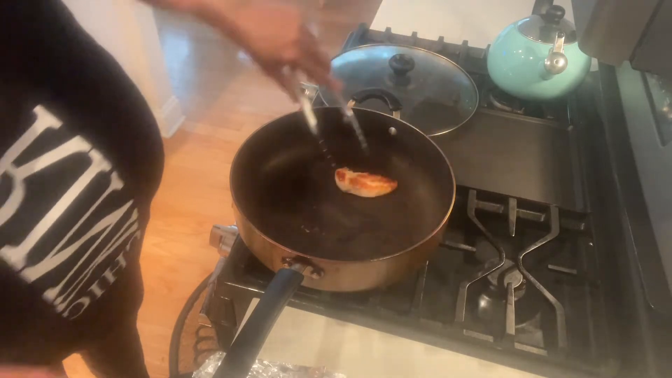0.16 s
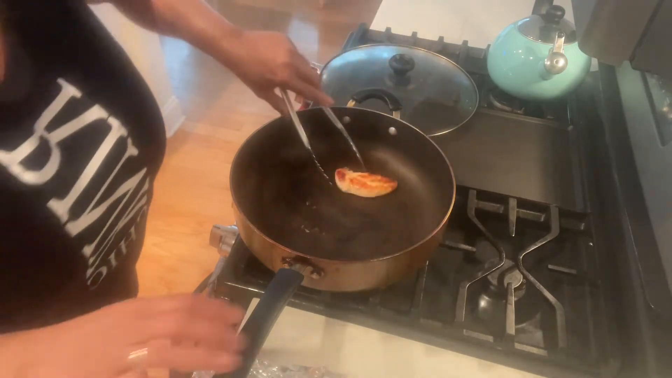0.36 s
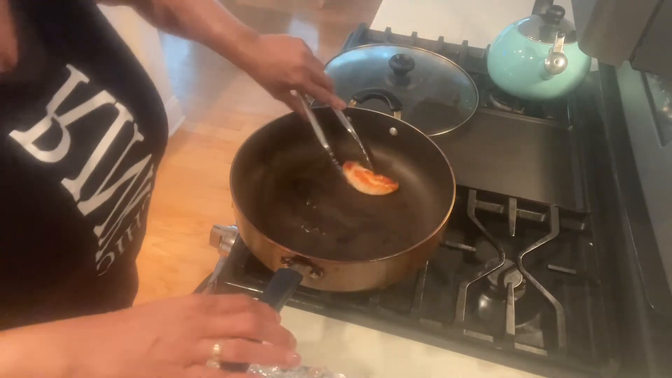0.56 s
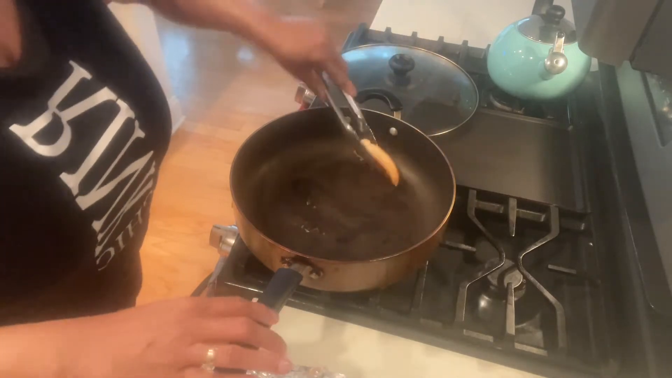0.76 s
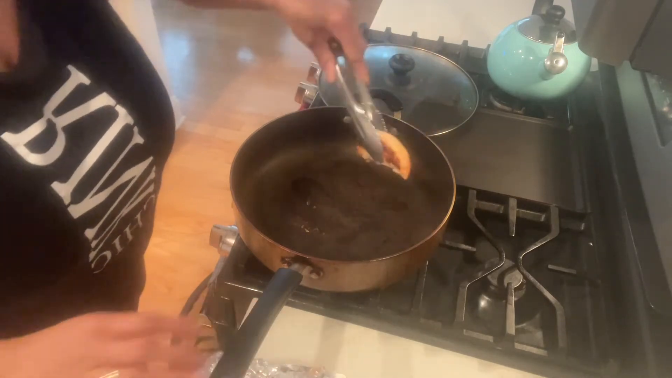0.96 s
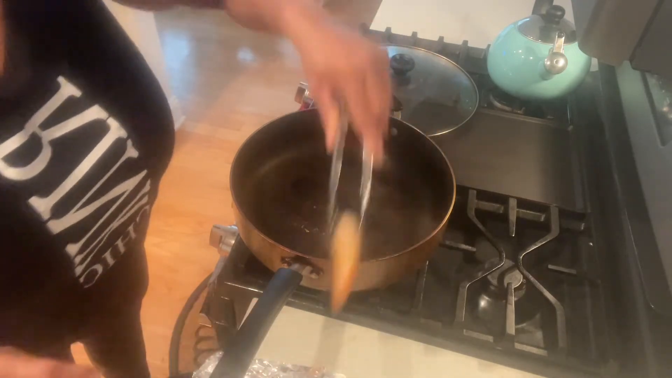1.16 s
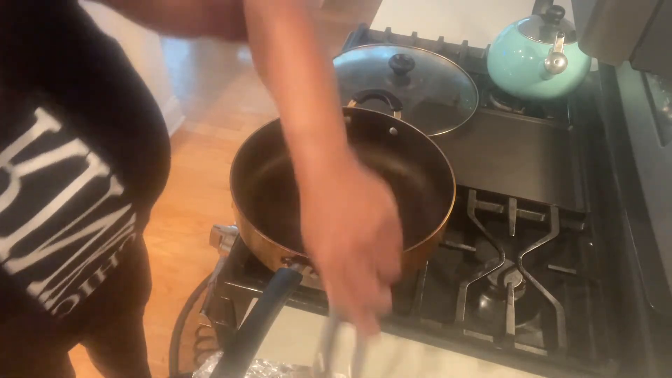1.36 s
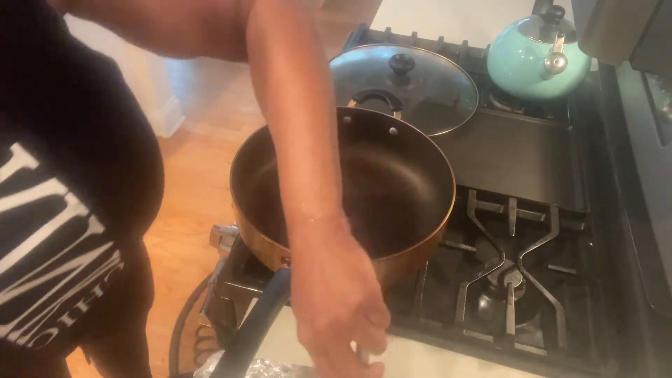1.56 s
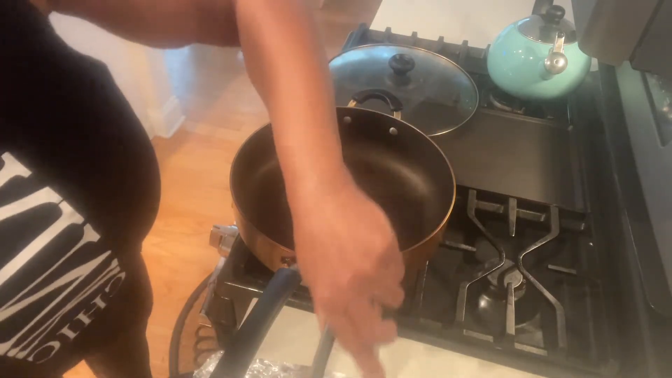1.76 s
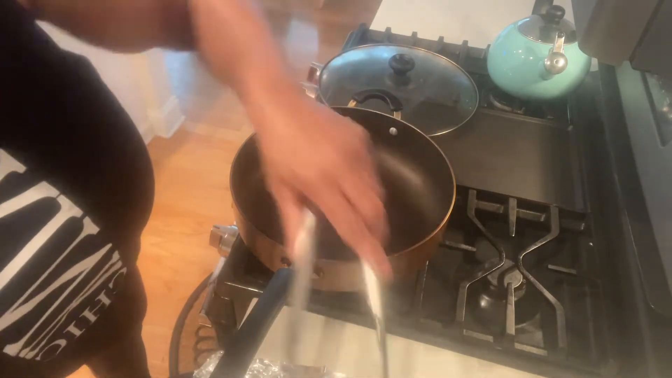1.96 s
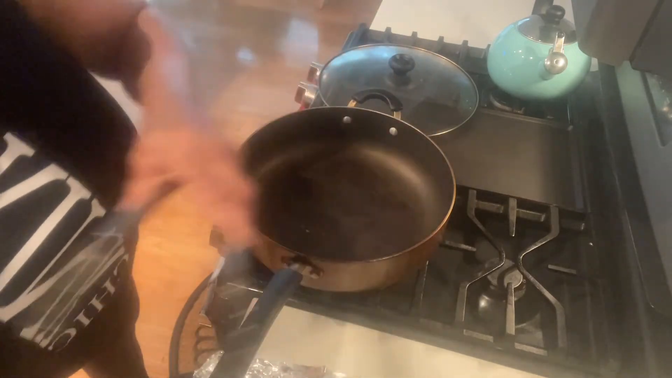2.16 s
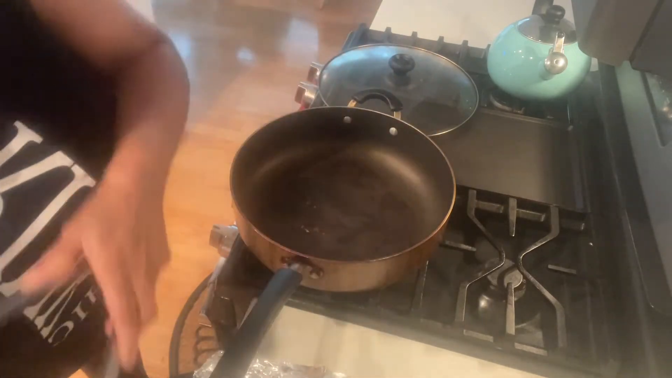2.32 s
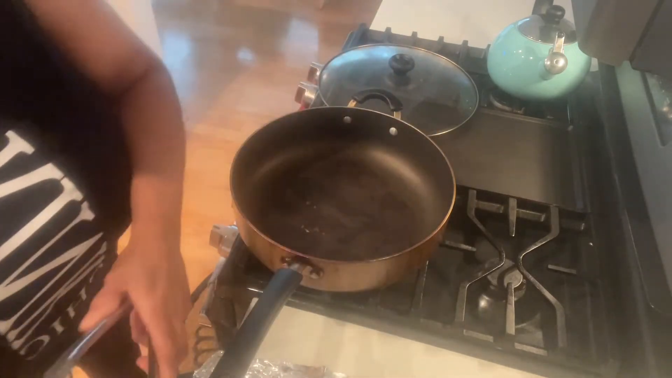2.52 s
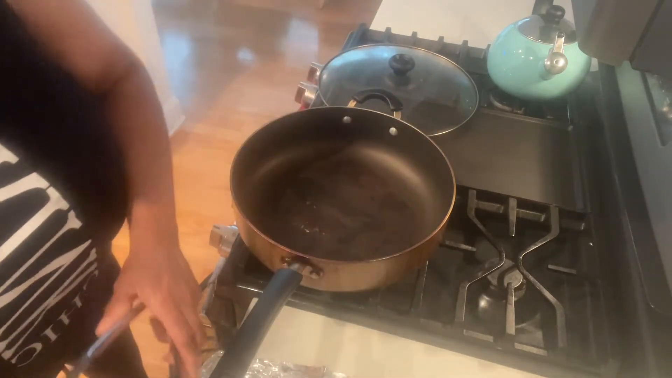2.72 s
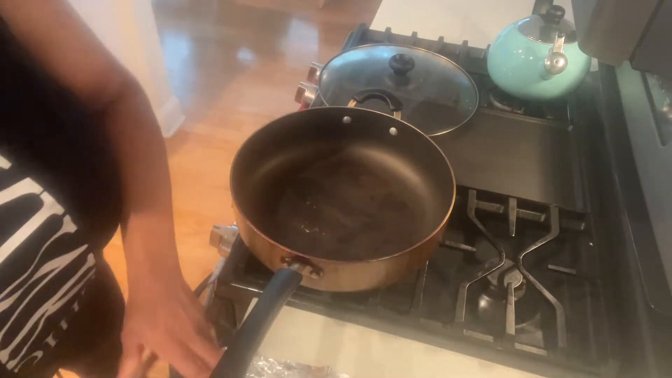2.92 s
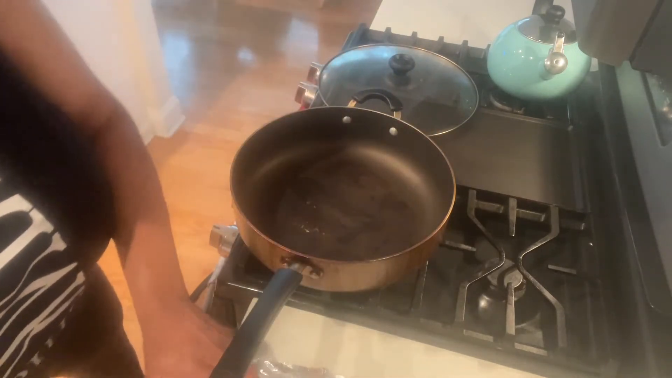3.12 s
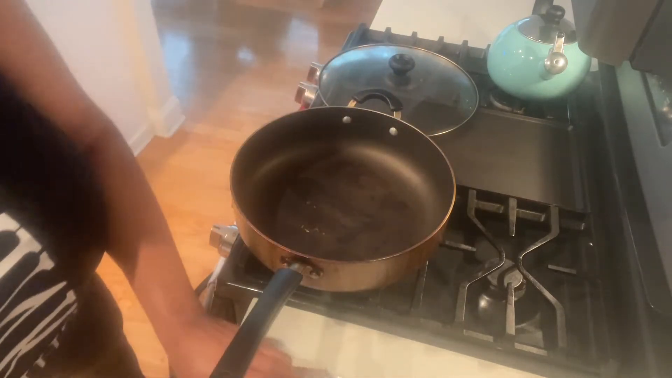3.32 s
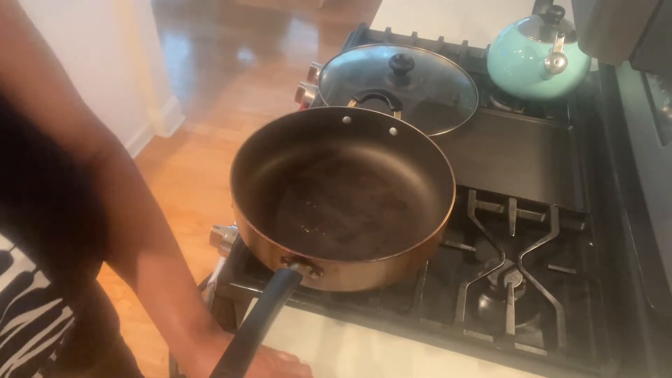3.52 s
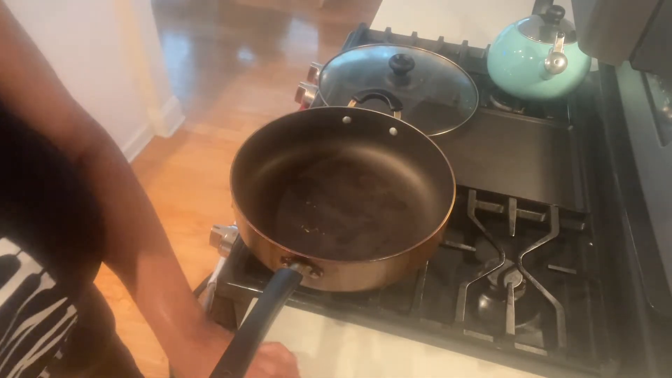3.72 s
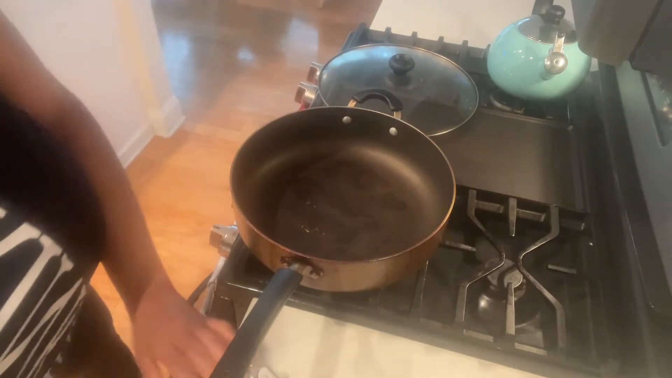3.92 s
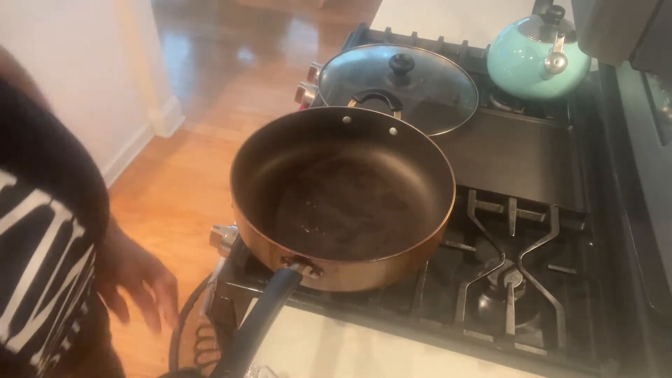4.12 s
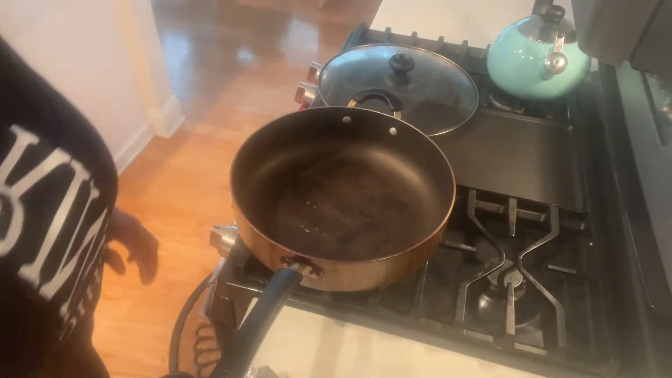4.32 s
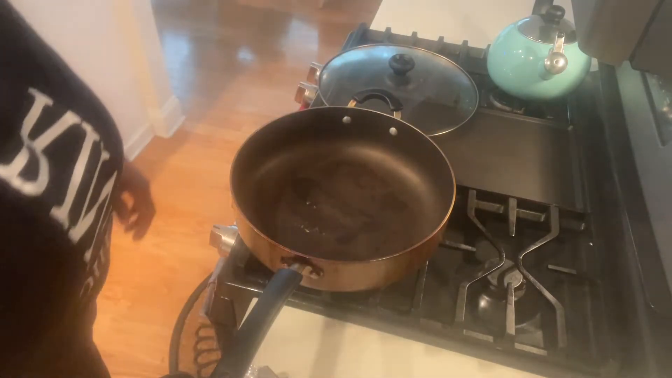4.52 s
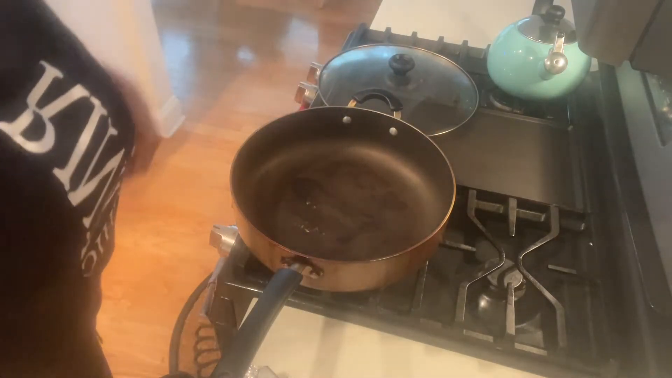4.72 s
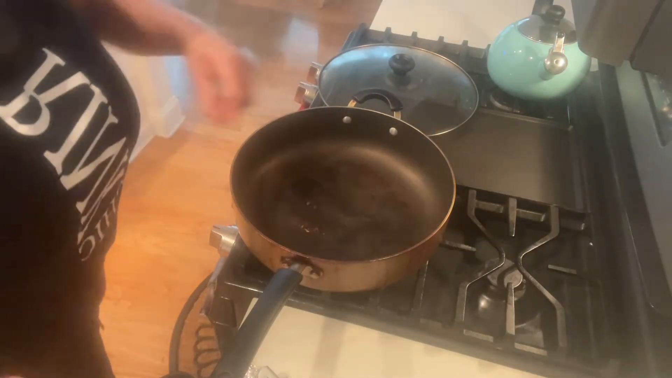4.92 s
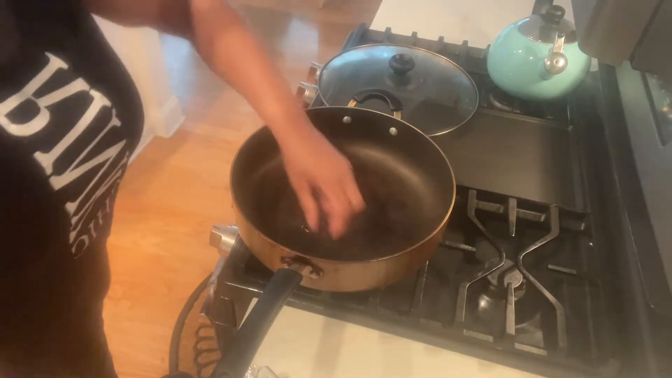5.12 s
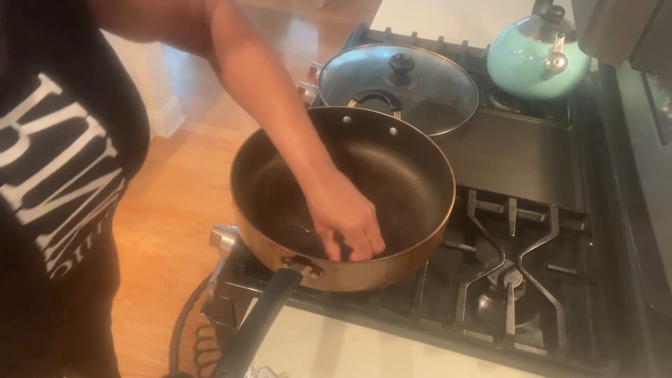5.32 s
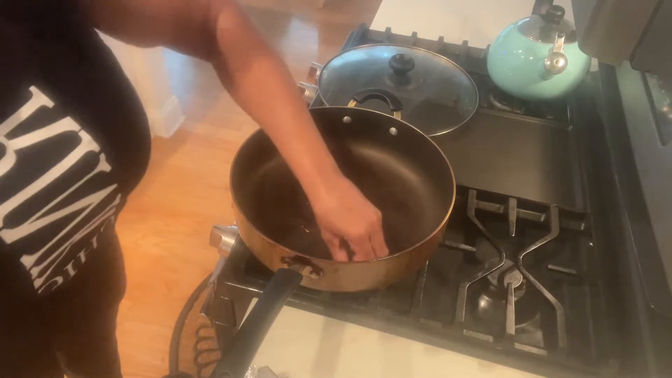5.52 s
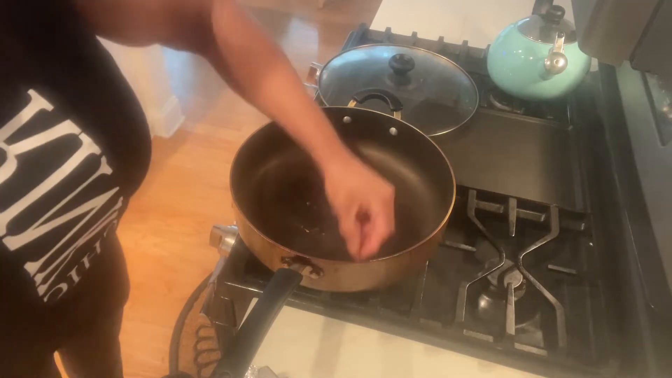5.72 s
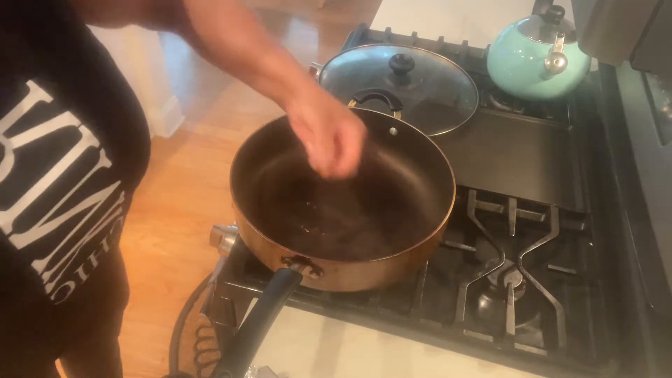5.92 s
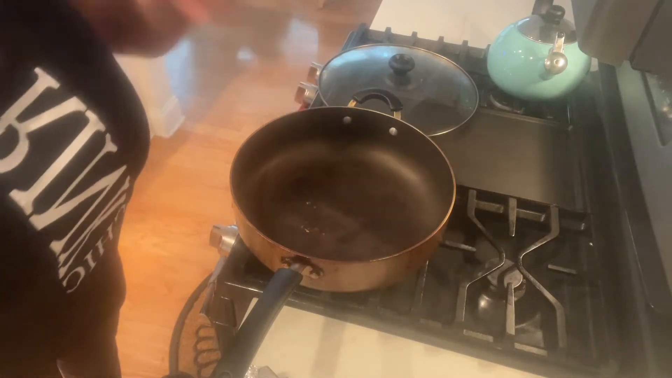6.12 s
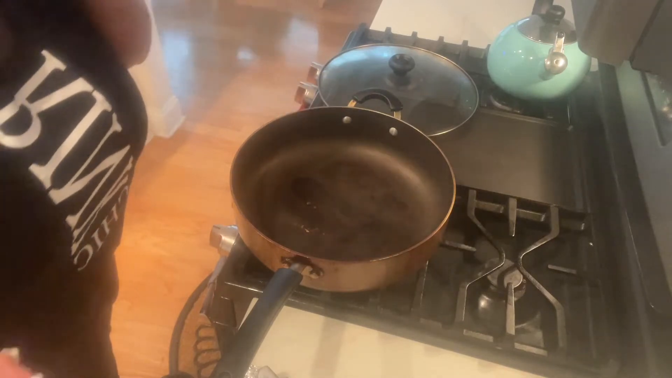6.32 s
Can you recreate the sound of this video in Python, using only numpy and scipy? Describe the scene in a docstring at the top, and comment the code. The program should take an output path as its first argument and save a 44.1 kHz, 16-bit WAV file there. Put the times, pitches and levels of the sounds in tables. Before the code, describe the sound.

In a small kitchen, steel tongs knock and drag on a frying pan, making it ring briefly. Foil then gives a short, sharp crackle, and after a pause it crinkles for about a second as hands press it, with soft low thuds on the counter. Sleeves brush faintly, and near the end a fingertip slides lightly in the pan. A fan and a fridge hum quietly throughout, heard through a nearby phone in stereo.

```python
"""A sleeve brushes by while a fan and a fridge motor hum in a small tiled kitchen. Something ticks faintly,
then steel tongs knock and drag on a frying pan and make it ring. Food is laid on foil, whose creases
snap and crackle as they flip under the hands. The counter thuds now and then, and near the end a
fingertip taps and slides in the pan. A phone listens through two microphone ports, left and right."""
import sys
import numpy as np
from scipy import signal
from scipy.fft import rfft, irfft, next_fast_len
from scipy.io import wavfile
from scipy.ndimage import uniform_filter1d, map_coordinates

SR = 44100
rng = np.random.default_rng(int(sys.argv[2]) if len(sys.argv) > 2 else 0)


def generate_wav(sig):
    """Save sig (samples, or channels by samples) to the path in sys.argv[1] as 16-bit PCM at SR."""
    pcm = np.round(np.clip(np.atleast_2d(sig).T, -1, 1) * 32767).astype(np.int16)
    wavfile.write(sys.argv[1], SR, pcm)


N = 285327

# Levels in the tables are relative. A "colour" says how strong a sound is at each frequency.
# Sleeves and palms. Each row: start and hold in seconds, level in dB, extra treble in dB.
BRUSHES = [(-0.05, 0.042, -52.5, -9), (1.294, 0.065, -68, -13), (2.272, 0.36, -74, 4),
           (2.333, 0.3, -76.5, 8.5), (3.86, 0.23, -63.5, -1), (4.134, 0.18, -65.5, -3),
           (4.514, 0.039, -73, 1), (4.63, 0.028, -73, 1.5), (4.702, 0.03, -73.5, 7), (5.3, 0.04, -65, -21),
           (5.398, 0.069, -73.5, 4.5), (6.302, 0.045, -69, -23)]
# The colour of rubbing cloth or skin. Each row: frequency in Hz, level in dB.
CLOTH_COLOUR = [(1000, 0.5), (2200, -5), (3000, -4.5), (3900, -0.5), (5200, -8), (6400, -7.5), (7500, -8),
                (8300, -7.5), (9100, -6.5), (10500, -10), (13000, -15), (16500, -19)]
# Tones of the fan and the fridge motor. Each row: multiple of the turning rate, level in dB.
FAN_TONES = [(1, -57), (2, -63), (3, -58), (4, -71), (9, -77)]
FRIDGE_TONES = [(1, -58), (2, -63), (3, -68), (7, -76), (8, -75), (13, -81), (14, -81), (15, -77),
                (17, -76), (18, -82), (19, -79), (20, -74), (21, -81)]
# The colour of room air and the fan's rush. Each row: frequency in Hz, level in dB.
AIR_COLOUR = [(15, -45), (25, -24.5), (65, 5), (118, -6), (232, -5), (378, -14.5), (568, -17.5),
              (669, -13.5), (831, -21.5), (1180, -24.5), (1640, -40), (6040, -51.5), (8830, -49),
              (11900, -58), (16500, -68)]
# How alike the air sounds at both ports. Each row: frequency in Hz, likeness (1 means the same).
AIR_LIKENESS = [(60, 0.92), (290, 1), (640, 0.13), (1400, 0.071), (4000, 0.079), (12000, 0.12)]
# Foil snaps and a few faint stray ticks.
# Each row: start in seconds, low, middle and treble levels in dB, pitch in Hz, rise in ms.
SNAPS_AND_TICKS = [(0.128, -68, -64, -67, 1240, 1.9), (0.218, -93, -70, -60, 7000, 2.5),
                   (1.2484, -70.5, -62, -62.5, 2500, 1.5), (1.379, -68, -74, -71, 2500, 2),
                   (1.4752, -38.5, -37.5, -44, 1440, 1.5), (1.5175, -47.5, -34.5, -35, 1765, 3),
                   (1.5288, -30.5, -29.5, -25.5, 2465, 1.5), (1.5360, -41.5, -30, -28, 1195, 2.6),
                   (1.543, -38, -36, -37.5, 1215, 2), (1.5533, -31.5, -40, -45, 1450, 2),
                   (1.5685, -42, -29.5, -20.5, 4900, 1), (1.636, -40.5, -32, -20, 3740, 1.3),
                   (1.681, -38.5, -29, -26, 1540, 0.61), (2.7217, -42.5, -51, -64, 3900, 1.2),
                   (2.744, -44, -66, -47, 880, 2), (2.7755, -45, -50, -70, 2300, 3),
                   (2.870, -41.5, -69, -65, 1020, 3.5), (2.9053, -45.5, -50, -52, 1400, 2.5),
                   (2.917, -49.5, -64, -58, 1100, 2.4), (2.9559, -44.5, -45.5, -48, 2600, 3),
                   (2.962, -36, -43, -45.5, 1600, 3), (2.972, -42.5, -42.5, -57, 1750, 3.5),
                   (2.981, -43.5, -41, -44.5, 2120, 3.7), (3.1491, -43.5, -45, -44, 4960, 2),
                   (3.1536, -41.5, -39.5, -35, 1780, 1.6), (3.1613, -41.5, -30, -41, 1990, 2.5),
                   (3.2, -43, -40, -34.5, 2500, 2), (3.2058, -39, -36.5, -36.5, 1540, 1.5),
                   (3.2116, -35.5, -32, -30, 4030, 1.5), (3.2435, -39.5, -47, -38.5, 1690, 2),
                   (3.2481, -38, -42.5, -48.5, 1335, 2), (3.3426, -35.5, -21, -25, 3300, 1.8),
                   (3.361, -42, -35, -30, 4500, 1.5), (3.3748, -37, -33.5, -42, 1800, 2.2),
                   (3.3834, -35.5, -31.5, -27.5, 2250, 2), (3.391, -27.5, -23.5, -18.5, 2440, 1.6),
                   (3.3973, -26, -28.5, -26, 1300, 2.3), (3.408, -29, -31.5, -28, 1710, 5.5),
                   (3.4182, -23.5, -32.5, -40, 1160, 2.63), (3.4328, -32, -35, -24.5, 1750, 2.5),
                   (3.4571, -41, -30.5, -36, 1100, 2.5), (3.4625, -38, -35.5, -42.5, 2600, 2),
                   (3.486, -38.5, -38, -45, 1750, 2), (3.500, -37, -37, -46, 2700, 1.4),
                   (3.533, -40, -39, -47, 1800, 2.5), (3.556, -43, -35, -50, 2000, 2.5),
                   (3.7276, -49, -37, -30.5, 2630, 1.9), (3.7552, -37.5, -36.5, -33, 2990, 2),
                   (3.76, -36.5, -32.5, -30.5, 1720, 2.5), (3.7679, -41.5, -32, -33, 1730, 2.6),
                   (3.787, -47, -33.5, -36.5, 4660, 2), (6.254, -80, -75.5, -56.5, 7500, 1.3),
                   (6.4235, -54, -67, -71, 1750, 1.6)]
# Colours of the foil's low boom, middle and treble. Each row: frequency in Hz, level in dB.
FOIL_BOOM = [(120, -24.5), (250, 4.5), (500, -12), (900, -5.5), (1500, -11), (3000, -50.5)]
FOIL_MIDDLE = [(300, -15.5), (700, -9.5), (1000, -4.5), (1700, -2.5), (2600, 2), (3400, -0.5), (5000, -9.5),
               (8000, -41)]
FOIL_TREBLE = [(2500, -28), (4300, 1), (5200, 0), (6300, 6), (8500, 3.5), (10500, 3), (12500, 1.5),
               (15000, -4), (16500, -23.5)]
# Hands pressing the foil, one list per press. Each row: time in seconds, level in dB, extra treble in dB.
PRESSES = [
    [(1.478, -47.5, -12.5), (1.55, -43, -6.5), (1.6, -59.5, -9), (1.7, -56.5, 1.5), (1.76, -69.5, 7),
     (1.82, -78.5, 11.5)],
    [(2.724, -57.5, -15), (2.89, -71.5, 3), (2.92, -63, -1), (2.95, -60.5, 0.5), (2.985, -52.5, -3),
     (3.03, -63.5, 4.5), (3.14, -63.5, -1), (3.2, -48.5, -3.5), (3.335, -50.5, -2), (3.46, -46.5, 0),
     (3.585, -45.5, -8), (3.62, -59, -5.5), (3.68, -81, -2)],
    [(3.724, -54.5, 6.5), (3.732, -45.5, 4), (3.76, -40.5, 1), (3.83, -51, 4.5), (3.85, -62, -2),
     (3.92, -78.5, 9.5)],
]
# Tongs hitting the pan. Each row: start in seconds, then thump, click and ring of the tongs in dB.
BLOWS = [(0.3162, -7, -27, -36), (0.3189, -9, -33, -40), (0.3250, -14, -38, -54), (0.3325, -20, -38, -54),
         (0.3370, -18, -35, -54), (0.4685, -25, -44, -44), (0.6655, -40, -25, -28)]
# Modes (tones a thing rings at) of the pan on its grate, its briefly yielding floor and the tongs' arms.
# Each row: pitch in Hz, width in Hz (wider dies sooner), level in dB.
PAN_MODES = [(335, 32, -11.5), (386, 22, -13), (461, 16.8, 2), (563, 33, -4.5), (630, 14, -11),
             (700, 53, -4), (771, 16, -16), (968, 42, -2.5), (925, 400, -11), (994, 46, -11),
             (1300, 45, -14), (1660, 32, -15.5), (1770, 60, -16), (2280, 90, -20), (2636, 140, -17.5),
             (3098, 55, -10.5), (3530, 204, -10.5), (4350, 90, -9), (4900, 80, -8.5), (6070, 76, -8),
             (6930, 68, -11), (7700, 110, -38), (9600, 160, -30), (11000, 240, -13)]
PAN_FLOOR_MODES = [(960, 260, 34.5)]
TONG_MODES = [(1360, 230, -14), (1690, 67, -7), (4200, 110, -16.5), (4700, 50, -11.5)]
# The colour of steel on steel. Each row: frequency in Hz, level in dB.
STEEL_COLOUR = [(600, 4.5), (1500, -1.5), (5000, 1.5), (8000, -2), (10500, -6), (13000, -8.5), (15500, -17),
                (16500, -44.5)]
# Tongs dragging. Each row: start and hold in seconds, level in dB, bright part at full force in dB.
DRAGS = [(0.34, 0.062, -32.5, -30), (0.46, 0.11, -26, -29), (0.667, 0.0023, -34.5, -29)]
# Thuds through the counter. Each row: start and hold in seconds, level in dB.
THUDS = [(0.401, 0.3, -47), (0.75, 0.1, -48.5), (1.525, 0.03, -39), (3.42, 0.066, -46.5),
         (3.762, 0.058, -44.5)]
# The colour of the counter. Each row: frequency in Hz, level in dB.
COUNTER_COLOUR = [(25, -23), (45, 4), (65, 9.5), (100, -9), (150, 1), (260, -41.5)]
# Skids of a tip of the tongs. Each row: start and hold in seconds, level in dB.
SKIDS = [(0.466, 0.045, -51.5), (0.552, 0.019, -48.5), (0.625, 0.03, -66)]
# A fingertip sliding in the pan. Each row: start and hold in seconds, level in dB, extra treble in dB.
SLIDES = [(5.436, 0.0063, -56, 4), (5.464, 0.0038, -62.5, 10.5), (5.506, 0.011, -61, -1),
          (5.516, 0.0054, -55.5, -3.5), (5.564, 0.02, -69, -8.5)]
# Modes of the pan under a fingertip. Each row: pitch in Hz, width in Hz, level in dB.
TOUCHED_PAN_MODES = [(1806, 32, 4.5), (2224, 25, 7), (2640, 42, 9.5), (3100, 14, 12.5), (3240, 20, 8),
                     (3370, 30, 3), (4200, 110, 0), (4940, 90, -2), (5880, 130, -1.5), (7100, 120, 1),
                     (8220, 110, -4.5), (9100, 94, -0.5), (10080, 64, 0.5), (11130, 150, 4.5),
                     (14000, 1500, -13.5)]
# How long the kitchen echoes. Each row: frequency in Hz, seconds to fade by 60 dB.
ECHO_FADE = [(300, 0.55), (1500, 0.29), (5000, 0.38), (12000, 0.055)]
# How strong that echo is. Each row: frequency in Hz, level in dB.
ECHO_LEVEL = [(200, -8), (400, -5), (700, -8.5), (2500, -6.5), (5000, -9.5), (9000, -8), (12000, -11.5),
              (15000, -14)]
# How far the left port's wave runs ahead of the right's. Each row: frequency in Hz, lead in radians.
PORT_LEAD = [(0, 0), (780, .9), (1810, .7), (2330, 1.6), (3100, 1.8), (4820, 5.0), (5940, 9.3), (7920, 6.5),
             (9560, 5.9), (11200, 3.4), (12700, 3.0), (14300, .4), (16400, -.2)]
# How much louder the left port is. Each row: frequency in Hz, left minus right in dB.
PORT_BALANCE = [(60, -2), (110, -3.5), (200, -2.5), (380, -3), (700, 0), (1290, -1), (2380, -2), (4400, -2),
                (8120, 1), (15000, -0.5)]


def amp(db):
    """Turn decibels into a number to multiply by."""
    return np.exp(np.asarray(db) * (np.log(10) / 20))


def unit(x):
    """Scale x so that its average strength (rms) is 1."""
    return x / np.sqrt(np.mean(x ** 2) + 1e-20)


def along(points, hz):
    """Read between a table's rows, with frequency spaced in octaves."""
    freqs, values = np.transpose(points)
    return np.interp(np.log(hz + 1), np.log(freqs + 1), values)


def wobble(per_s):
    """A smooth random curve through per_s new values a second."""
    steps = np.arange(0, N + 16, 16)
    values = rng.standard_normal(int(N * per_s / SR) + 4)
    return np.interp(np.arange(N), steps, map_coordinates(values, [steps * per_s / SR]))


def filtered(x, response):
    """Scale and shift each frequency of x by response(hz)."""
    size = next_fast_len(N + SR // 2)
    return irfft(rfft(x, size) * response(np.fft.rfftfreq(size, 1 / SR)), size)[..., :N]


def muffled(x, above_hz):
    """Take away the treble."""
    return filtered(x, lambda hz: 1 / (1 + (hz / above_hz) ** 6))


def coloured(x, colour):
    """Give x a colour from a table, at strength 1."""
    return unit(filtered(x, lambda hz: amp(along(colour, hz))))


def ringing(x, modes):
    """Let the push x ring an object's modes, which alternate in sign."""
    return filtered(x, lambda hz: sum(
        (-1) ** k * amp(db) * 1j * hz * width / (pitch ** 2 - hz ** 2 + 1j * hz * width)
        for k, (pitch, width, db) in enumerate(modes)))


def grains(per_s, spread_db, smooth):
    """Scattered clicks of uneven size over some smooth noise, at strength 1."""
    hits = rng.random(N) < per_s / SR
    clicks = hits * amp(spread_db * rng.standard_normal(N)) * rng.choice([-1, 1], N)
    return unit(unit(clicks) + smooth * rng.standard_normal(N))


def strokes(rows, attack_s, release_db_per_s, sag_db_per_s=0):
    """One loudness curve per row: it rises, holds or sags, then fades."""
    start, hold, db = np.transpose(rows)[:3, :, None]
    t = np.arange(N) / SR - start
    fall_db = sag_db_per_s * np.clip(t, 0, hold) + release_db_per_s * np.clip(t - hold, 0, None)
    return np.clip(t / attack_s, 0, 1) ** 2 * amp(db - fall_db)


def rubbed(noise, levels, rows, treble_hz):
    """Play noise at each stroke's level, with the extra treble that ends its row."""
    dull = muffled(noise, treble_hz)
    treble_gains = amp(np.transpose(rows)[-1])
    return levels.sum(axis=0) * dull + treble_gains @ levels * (noise - dull)


def brushing():
    """Sliding sleeves and palms hiss softly, some strokes duller, some brighter."""
    levels = strokes(BRUSHES, attack_s=0.025, release_db_per_s=289, sag_db_per_s=16.5)
    hiss = amp(0.72 * wobble(30)) * coloured(rng.standard_normal(N), CLOTH_COLOUR)
    return rubbed(hiss, levels, BRUSHES, treble_hz=5780)


def motor_hum(turn_hz, tones, waver_db, gain_db):
    """A motor hums at multiples of its turning rate, each wavering a little in level."""
    phase = 2 * np.pi * turn_hz * np.cumsum(1 + .0008 * wobble(2.5)) / SR
    return sum(amp(db + gain_db + waver_db * wobble(3)) * np.sin(k * phase + 2 * np.pi * rng.random())
               for k, db in tones)


def air():
    """Moving air rushes steadily, alike at both ports only in the bass."""
    def share(hz):
        angle = np.arccos(np.clip(along(AIR_LIKENESS, hz), -1, 1)) / 2
        return amp(along(AIR_COLOUR, hz)) * [np.cos(angle), np.sin(angle)]
    mid, side = filtered(rng.standard_normal((2, N)), share)
    return amp(-52 + 0.2 * wobble(0.89)) * unit(np.array([mid + side, mid - side]))


def snaps_and_ticks():
    """Flipping creases and stray ticks rattle and ping. Also gives the power of the crackle after them."""
    fade_s = np.array([[.028], [.028], [.02]])  # low, middle, treble: time to fall by 60 dB
    ping_cycles, after_fade_s = 22, 0.14
    levels, pings, after = np.zeros((3, N + SR)), np.zeros(N + SR), np.zeros((2, N + SR))
    t = np.arange(SR // 3) / SR
    for start, low_db, middle_db, treble_db, ping_hz, rise_ms in SNAPS_AND_TICKS:
        span = slice(round(start * SR), round(start * SR) + len(t))
        rise_s = rise_ms / 1000
        rise = 1 - np.exp(-(t / rise_s) ** 2)
        bands_db = np.array([[low_db], [middle_db], [treble_db]])
        ping_db = bands_db.max() - 11 - 60 * t * ping_hz / ping_cycles
        pings[span] += rise * amp(ping_db) * np.sin(2 * np.pi * ping_hz * t)
        rattle_s = fade_s + 5.1 * rise_s  # a slower snap rattles longer
        levels[:, span] += rise * amp(bands_db - 60 * t / rattle_s)
        after_db = np.array([[middle_db - 19], [treble_db - 20]])
        after[:, span] += (rise * amp(after_db - 60 * t / after_fade_s)) ** 2
    shiver = amp(0.47 * wobble(540)) * rng.standard_normal(N)
    rattle = coloured(shiver, FOIL_MIDDLE)
    low = muffled(rattle, above_hz=1720)
    knock = amp(-18) * coloured(shiver, FOIL_BOOM)
    bands = [unit(low) + knock, unit(rattle - low), coloured(shiver, FOIL_TREBLE)]
    return (levels[:, :N] * bands).sum(axis=0) + pings[:N], after[:, :N]


def foil_tinkle(per_s=260, centre_hz=2000, spread_octaves=.55, fade_cycles=30):
    """Small creases ping at random times, pitches and sizes."""
    shape, t = (round(per_s * N / SR), 1), np.arange(SR // 40) / SR
    starts = (rng.random(shape) * N).astype(int)
    hz = centre_hz * 2 ** (spread_octaves * rng.standard_normal(shape))
    db = 5 * rng.standard_normal(shape) - 60 * t * hz / fade_cycles
    pings = amp(db) * (1 - np.exp(-t / .001)) * np.sin(2 * np.pi * hz * t)
    samples = starts + np.arange(len(t))
    return unit(np.bincount(samples.ravel(), pings.ravel())[:N])


def foil_crackle(after_snaps):
    """Small creases keep flipping after each snap and while the hands press."""
    t = np.arange(N) / SR
    times, press_db, treble_db = np.transpose(np.vstack(PRESSES))
    pressing = sum((t >= rows[0][0]) & (t <= rows[-1][0]) for rows in PRESSES) > 0
    press = amp(np.interp(t, times, press_db)) * uniform_filter1d(pressing * 1., size=80)
    press_treble = press * amp(np.interp(t, times, treble_db))
    middle, treble = np.sqrt(after_snaps + np.array([press, press_treble]) ** 2)
    boom = amp(-24.5) * middle ** 0.68  # grows less steeply than the crackle
    flips = grains(per_s=4000, spread_db=3, smooth=0.79)
    layers = [(FOIL_BOOM, boom), (FOIL_MIDDLE, middle), (FOIL_TREBLE, treble)]
    # coarse and fine creases flip in clumps of their own
    crackle = sum(level * amp(0.85 * wobble(70)) * coloured(flips, colour) for colour, level in layers)
    return crackle + amp(-3) * middle * foil_tinkle()


def wide_sheet(x, depth_db=1.6, wander_rad=0.6):
    """The sheet rings in passing patches; its width makes the phase between the ports wander."""
    hz, _, spectrum = signal.stft(x, SR, nperseg=256)

    def patches(bins, frames):
        noise = rng.standard_normal(spectrum.shape)
        return unit(uniform_filter1d(uniform_filter1d(noise, bins, axis=0), frames, axis=1))
    gain = amp(depth_db * patches(2, 4) - depth_db ** 2 / 9)
    spin = np.exp(1j * wander_rad * patches(8, 8) / (1 + (hz[:, None] / 7500) ** 4))  # less in treble
    return signal.istft(spectrum * gain * [spin, 1 / spin], nperseg=256)[1][:, :N]


def foil(bounce_s=0.0019):
    """The foil's snaps and crackle, and the stray ticks, bounce once off the counter."""
    snaps, after_snaps = snaps_and_ticks()
    sheet = wide_sheet(snaps + foil_crackle(after_snaps))
    return filtered(sheet, lambda hz: 1 + 0.075 * np.exp(-2j * np.pi * hz * bounce_s))


def pan_low(push):
    """A push rings the pan's low modes; the pan is too small to give off deep bass."""
    dull = filtered(push, lambda hz: (1j * hz / (220 + 1j * hz)) ** 2 / (1 + 1j * hz / 1300) ** 2)
    return ringing(dull, PAN_MODES)


def pan_high(push):
    """The sharp part of a push rings the pan's high modes."""
    bright = filtered(push, lambda hz: (1j * hz / (1500 + 1j * hz)) ** 3 / (1 + (hz / 11000) ** 8))
    return ringing(bright, PAN_MODES)


def tong_blows(crack_fade_s=0.03):
    """Each blow rings the pan and the tongs. Gives that ringing and the crack of steel on steel."""
    thumps, clicks, taps, cracks = np.zeros((4, N))
    t = np.arange(SR // 20) / SR
    for start, thump_db, click_db, tongs_db in BLOWS:
        at = round(start * SR)
        thumps[at], clicks[at], taps[at] = amp([thump_db, click_db, tongs_db])
        cracks[at:at + len(t)] += amp(click_db - 11 - 60 * t / crack_fade_s)
    # a narrow tip hardly moves the lowest modes
    tip = filtered(thumps, lambda hz: (1j * hz / (800 + 1j * hz)) ** 2)
    knock = filtered(ringing(thumps, PAN_FLOOR_MODES), lambda hz: 1 / (1 + 1j * hz / 2200) ** 3)
    arms = filtered(ringing(taps, TONG_MODES), lambda hz: 1 / (1 + 1j * hz / 7000) ** 2)
    ring = amp(41.5) * pan_low(tip) + knock + amp(20) * pan_high(clicks) + amp(43.5) * arms
    return ring, cracks * coloured(rng.standard_normal(N), STEEL_COLOUR)


def tong_drags():
    """Dragging tongs chatter over the pan in many tiny blows."""
    chatter = grains(per_s=950, spread_db=-3, smooth=0.91)
    force = strokes(DRAGS, attack_s=0.005, release_db_per_s=377, sag_db_per_s=30)
    bright = unit(unit(pan_high(chatter)) + 0.59 * coloured(chatter, STEEL_COLOUR))
    bright_level = amp(np.transpose(DRAGS)[-1]) @ force ** 0.67  # grows less steeply than the force
    return force.sum(axis=0) * unit(pan_low(chatter)) + bright_level * bright


def counter_thuds():
    """Hands and tongs load the counter, which gives a lumpy low noise."""
    level = strokes(THUDS, attack_s=.015, release_db_per_s=150.5).sum(axis=0)
    return level * coloured(amp(0.35 * wobble(4)) * rng.standard_normal(N), COUNTER_COLOUR)


def tong_squeaks(pitch_hz=3090, waver_hz=13):
    """A tip of the tongs sings a wavering note as it skids."""
    level = strokes(SKIDS, attack_s=0.012, release_db_per_s=298).sum(axis=0)
    flicker = amp(2 * wobble(68.3))
    phase = 2 * np.pi * np.cumsum(pitch_hz + waver_hz * wobble(59.8)) / SR
    return level * unit(flicker * np.sin(phase))


def fingertip():
    """Skin rubs the pan, ringing its high modes while it damps the low ones."""
    rub = grains(per_s=2500, spread_db=2, smooth=1.2)
    levels = strokes(SLIDES, attack_s=0.0069, release_db_per_s=349)
    skin = unit(unit(ringing(rub, TOUCHED_PAN_MODES)) + 0.5 * coloured(rub, CLOTH_COLOUR))
    return rubbed(skin, levels, SLIDES, treble_hz=3700)


def pan(dip_hz=1123, width_hz=260, depth=0.55):
    """All the pan's sounds; in blows and drags its floor and wall partly cancel near dip_hz."""
    def dip(hz):
        return 1 - depth * 1j * hz * width_hz / (dip_hz ** 2 - hz ** 2 + 1j * hz * width_hz)
    drags, finger, squeaks = tong_drags(), fingertip(), tong_squeaks()
    ring, cracks = tong_blows()
    return filtered(ring + drags, dip) + cracks + squeaks + finger


def kitchen_echo(x, renew_s=.25, alike_below_hz=450):
    """Each frequency fades at its own speed.
    The echo is drawn afresh every renew_s, so it stays smooth and no pitch rings out."""
    step, length = round(renew_s * SR), SR // 2
    delay = 260  # samples
    blocks = np.pad(x, (delay, step - (N + delay) % step)).reshape(-1, 1, step)
    freqs, t, noise = signal.stft(rng.standard_normal((len(blocks), 2, length)), SR, nperseg=256)
    fade = amp(-60 * t / along(ECHO_FADE, freqs)[:, None])
    tails = signal.istft(noise * fade, SR, nperseg=256)[1][..., :length]
    echoes = signal.fftconvolve(blocks, tails / np.linalg.norm(tails[0, 0]), axes=2)
    both = np.zeros((2, N + 2 * step + length))
    for k, echo in enumerate(echoes):
        both[:, k * step:][:, :echo.shape[1]] += echo
    left, right = filtered(both[:, :N], lambda hz: amp(along(ECHO_LEVEL, hz)))
    mid = (left + right) / 2
    side = filtered((left - right) / 2, lambda hz: hz ** 2 / (hz ** 2 + alike_below_hz ** 2))
    return np.array([mid + side, mid - side])


def scene():
    """The nearby sounds and their echo, over the hum and the air."""
    struck, crumpled, brushed = pan(), foil(), brushing()
    echo = kitchen_echo(struck + crumpled.mean(axis=0) + amp(6.5) * brushed)
    fan = motor_hum(turn_hz=75.16, tones=FAN_TONES, waver_db=0.53, gain_db=2)
    fridge = motor_hum(turn_hz=59.5, tones=FRIDGE_TONES, waver_db=1.8, gain_db=2.5)
    return struck + crumpled + brushed + echo + counter_thuds() + fan + fridge + air()


def record(dry):
    """The phone's two ports differ in level and phase; deep bass and the highest treble are cut."""
    bass_hz, top_hz = 30, 16500
    half = np.array([[.5], [-.5]])  # half each way for left and right

    def response(hz):
        balance = amp(half * along(PORT_BALANCE, hz))
        lead = np.exp(1j * half * np.interp(hz, *np.transpose(PORT_LEAD)))
        return balance * lead * (1j * hz / (bass_hz + 1j * hz)) ** 3 * (hz < top_hz)
    return filtered(dry, response)


dry = scene()
out = record(dry)
generate_wav(out)
```